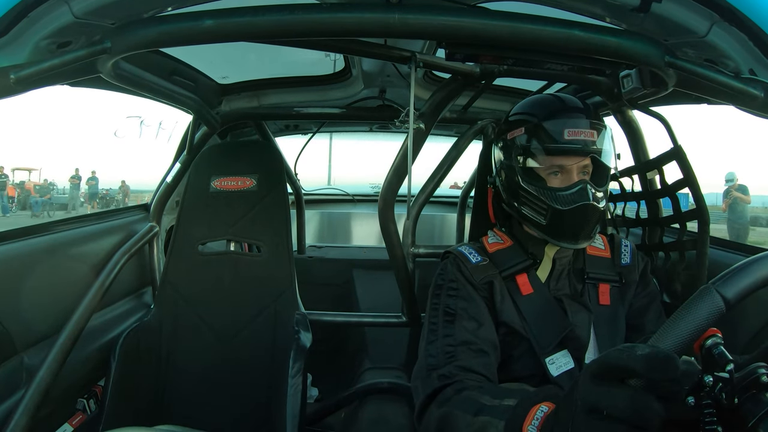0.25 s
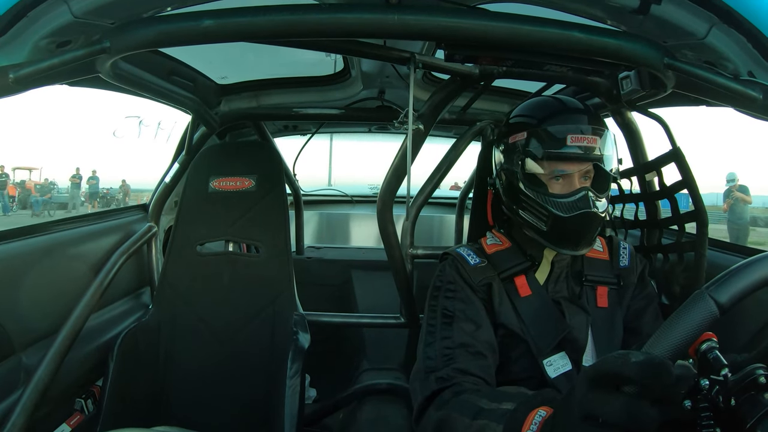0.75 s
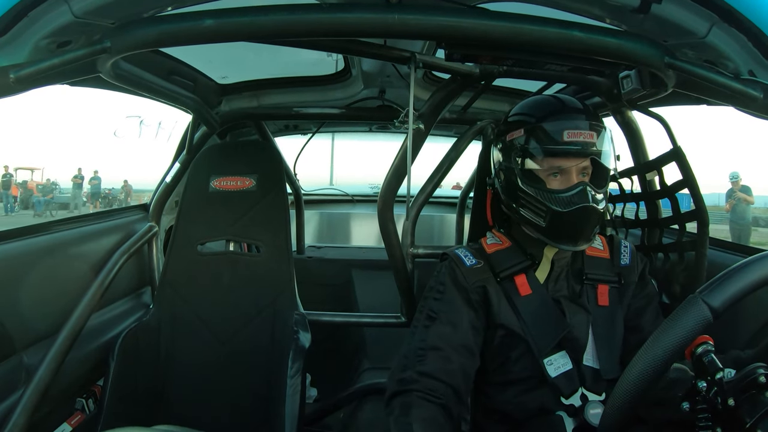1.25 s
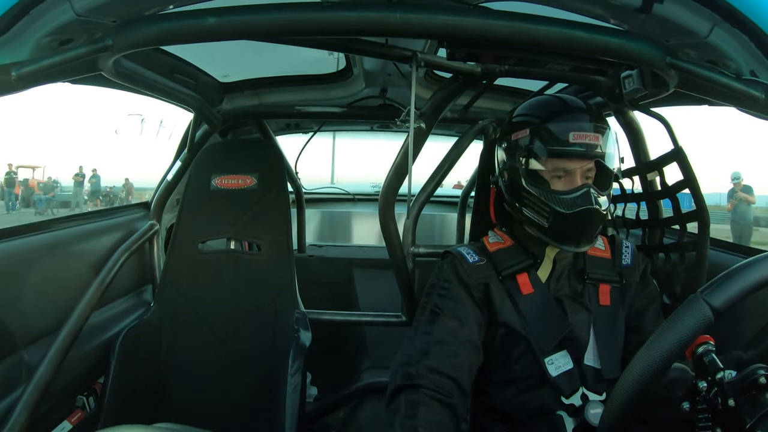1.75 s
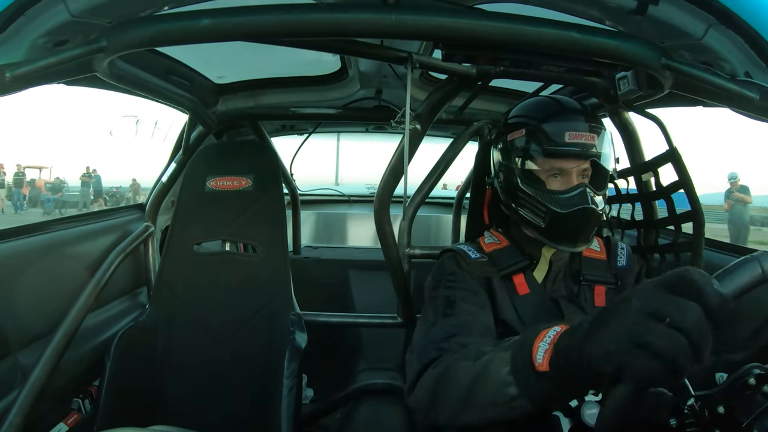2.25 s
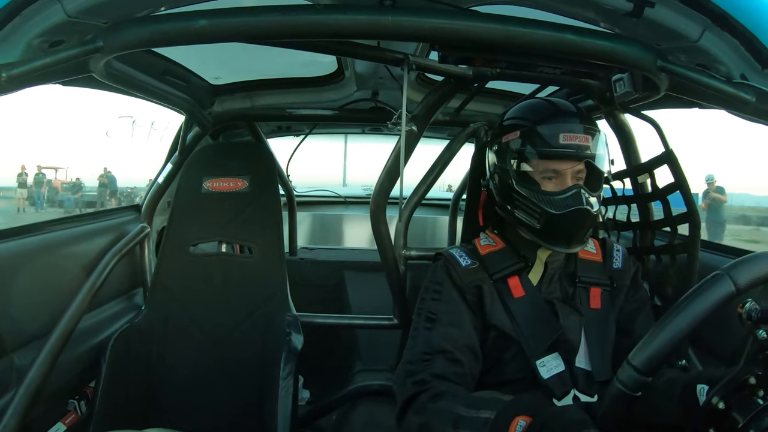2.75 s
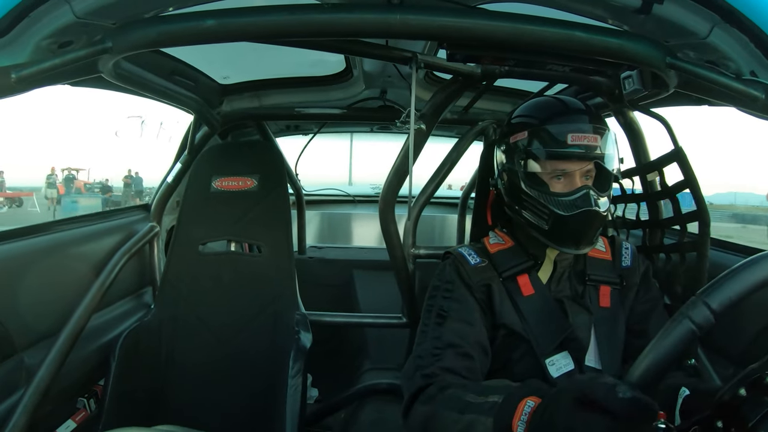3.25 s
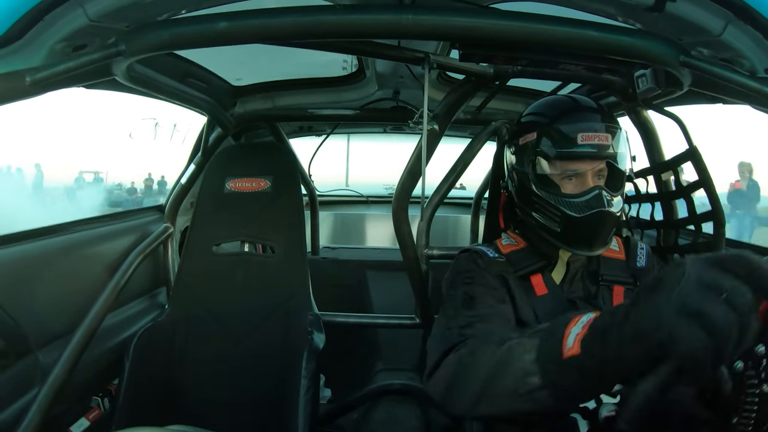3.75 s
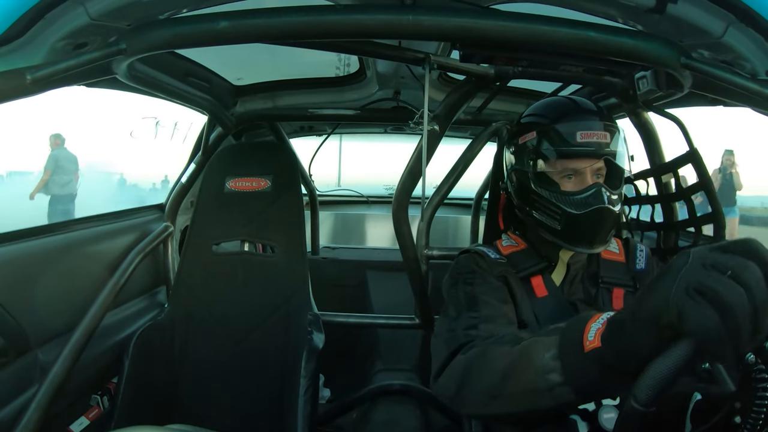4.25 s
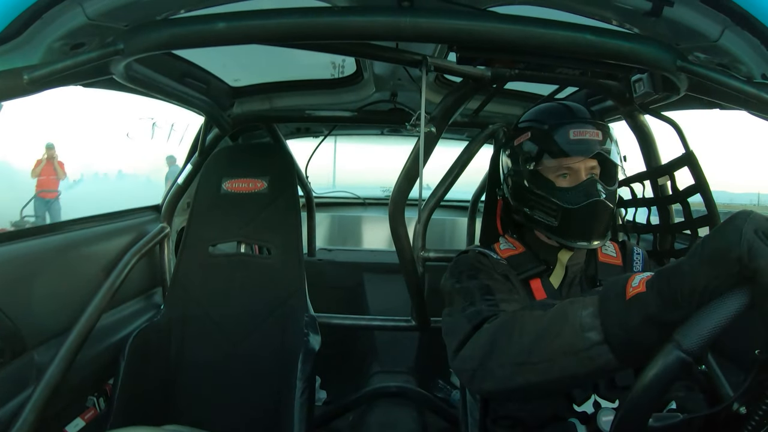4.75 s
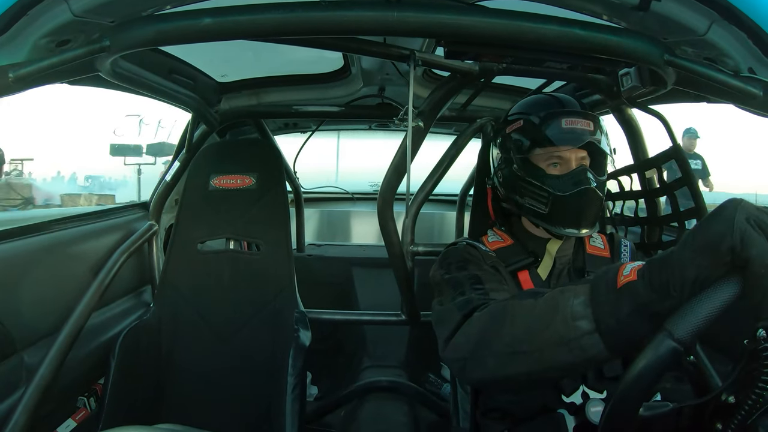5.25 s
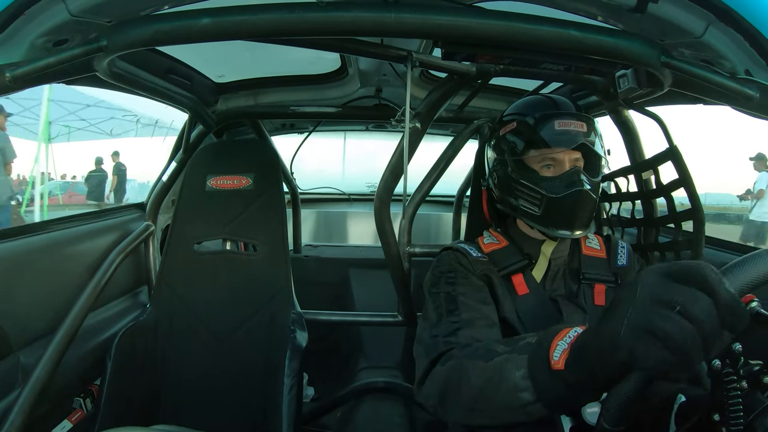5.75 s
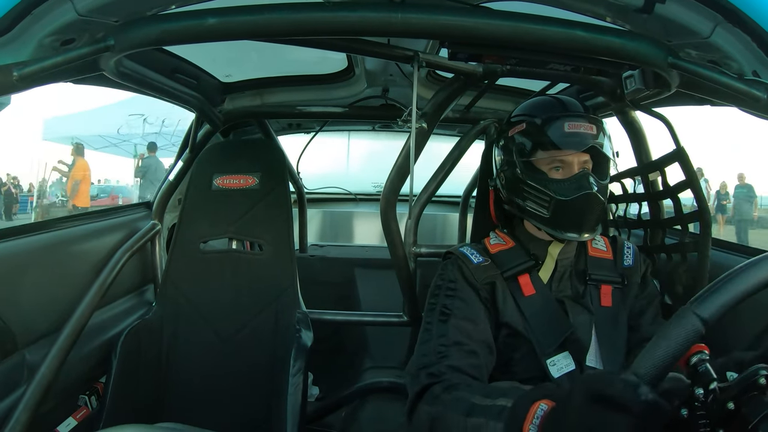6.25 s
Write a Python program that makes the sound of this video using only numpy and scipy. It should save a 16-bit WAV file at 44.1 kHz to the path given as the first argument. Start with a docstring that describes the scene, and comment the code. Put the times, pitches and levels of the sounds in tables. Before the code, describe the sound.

A turbocharged V8 booms and drones, heard from the dashboard inside a bare race car cabin. The revs climb from the start, with a thin turbo whistle rising from about 0.4 seconds. At 1.5 seconds the gear changes with a thump and two ringing panel knocks. The revs sag until about 2.2 seconds, then build again in a loud, raspy burnout, peaking just after 4 seconds. Beneath the engine, the spinning tyres hiss and fling sharp ticks of grit. Around 4.3 seconds the throttle shuts: air rushes out with a cluster of spits, a fluttering valve shriek follows from 4.5 to 4.7 seconds, and the exhaust gives several low booms. By 5 seconds the engine has dropped to a much quieter burble. The car rolls on with road rumble, a slight lift in revs and light knocks near 5.7 seconds, and a faint whistle sinking until 6.5 seconds.

```python
"""A turbo V8 booms and whistles up through first gear, heard inside a caged race car. It shifts at 1.5 s,
holds a burnout, then lifts off and rolls on. Exhaust orders drone in the bare cabin, gas rasps with
each firing, and the tyres hiss and fling grit at the wheel wells. The blow-off valve shrieks as the
throttle shuts, and the turbo's rotor winds down."""
import sys
import numpy as np
from scipy import signal
from scipy.fft import rfft, irfft
from scipy.io import wavfile
from scipy.ndimage import uniform_filter1d, minimum_filter1d

SR = 44100
rng = np.random.default_rng(int(sys.argv[2]) if len(sys.argv) > 2 else 0)


def inscribe(sig):
    """Save sig as 16-bit PCM at rate SR to the path in sys.argv[1].

    A 1-D sig is mono; a 2-D sig holds one channel per row.
    Samples are clipped to [-1, 1] before scaling.
    """
    pcm = np.round(np.clip(np.atleast_2d(sig).T, -1, 1) * 32767)
    wavfile.write(sys.argv[1], SR, pcm.astype(np.int16))


N = 286650
T = np.arange(N) / SR
BIN_HZ = np.fft.rfftfreq(N, 1 / SR) + 1
SPIN_START_S, SPIN_END_S = 1.4, 4.75  # the rear tyres break loose, then grip again


def undb(db):
    """Decibels to gain."""
    return 10 ** (np.asarray(db) / 20)


def unit(x):
    """Scale to rms 1."""
    return x / np.sqrt(np.mean(x ** 2))


def curves(table):
    """One control curve for each column after the time."""
    times, *columns = np.transpose(table)
    return [np.interp(T, times, column) for column in columns]


def held(start, end, attack, release):
    """Envelope that rises linearly, holds and dies away; times in seconds."""
    return np.clip((T - start) / attack, 0, 1) * np.exp(-np.clip((T - end) / release, 0, 20))


def bell(x, centre, half_width):
    """Bell-shaped rise and fall around a moment or a frequency."""
    return np.exp(-np.minimum(((x - centre) / half_width) ** 2, 20))


def response(hz, points):
    """Gain of a (Hz, dB) spectrum, falling steeply beyond its ends."""
    f, db = np.transpose(points)
    skirt = np.minimum(1, np.minimum(hz / f.min(), f.max() / hz)) ** 3
    return undb(np.interp(np.log(hz), np.log(f), db)) * skirt


def colour(x, points):
    """Filter by a (Hz, dB) spectrum; the result has rms 1."""
    return unit(irfft(rfft(x) * response(BIN_HZ, points), N))


def ring(x, modes):
    """Drive a bank of resonances; the result has rms 1."""
    gain = sum((-1) ** i * undb(db) / (1 + 1j * (BIN_HZ ** 2 - hz ** 2) / (BIN_HZ * width))
               for i, (hz, width, db) in enumerate(modes))
    span = response(BIN_HZ, [(modes[0][0], 0), (modes[-1][0], 0)])
    return unit(irfft(rfft(x) * gain * span, N))


def noise():
    """White noise."""
    return rng.standard_normal(N)


def walk(rate):
    """Random wander of rms 1 with about `rate` turns a second."""
    points = rng.standard_normal(N // 10)
    return unit(np.interp(T * rate, np.arange(len(points)), points))


def angle(hz):
    """Running phase of a moving frequency."""
    return 2 * np.pi * np.cumsum(hz) / SR


def tone(phase, rough, rate):
    """A tone of rms 1; roughness scatters part of it into a band about `rate` Hz wide."""
    wave = (1 + rough * walk(rate)) * np.sin(phase) + rough * walk(rate) * np.cos(phase)
    return wave / np.sqrt(.5 + rough ** 2)


# The dull colour of the track. Each row: frequency in Hz, gain in dB.
ROAD_COLOUR = [(18, -10), (30, -4.5), (50, -3), (100, -2), (200, -12), (270, -19.5), (400, -15.5),
               (550, -30), (900, -55.5)]
# The track rumble's fader. Each row: time in seconds, level in dB.
ROAD_LEVEL = [(0, -35), (1.35, -37), (1.55, -27), (2.2, -24.5), (2.8, -26), (3.4, -28.5), (4.2, -29),
              (4.55, -20), (5, -25.5), (5.7, -23), (6.5, -27.5)]

def chassis(cycle_hz, rev_octaves, spin):
    """Spinning wheels and drive shaft, geared to the crank, shake the shell over the track's rumble."""
    turn = angle(.64 * cycle_hz)
    build_up = np.clip((T - SPIN_START_S) / 3.1, 0, 1)
    shake = tone(turn, rough=.2, rate=16) + undb(-9) * tone(2 * turn, rough=.18, rate=8.4)
    wheels = build_up * undb(-28.5 + 17 * rev_octaves) * shake
    shaft = undb(-26.5) * tone(2.5 * turn, rough=.33, rate=12)
    road_db, = curves(ROAD_LEVEL)
    return spin * (wheels + shaft) + colour(noise(), ROAD_COLOUR) * undb(road_db)


# The ring of bare panels and glass. Each row: frequency in Hz, width in Hz, gain in dB.
PANEL_MODES = [(820, 45, 5), (1020, 39, 5.5), (1133, 50, 4.5), (1330, 100, 3), (1423, 50, 5.5),
               (1534, 59, 2.5), (1662, 47, 2), (1800, 45, 0), (2250, 110, -14), (2660, 67, -11),
               (3530, 82, -14)]
# Knocks at the shift and as the car rolls on. Each row: start in seconds, level in dB, decay in seconds.
KNOCK_HITS = [(1.508, -32, .04), (1.715, -32, .022), (5.686, -37, .02), (5.96, -40, .02)]

def knocks():
    """Loose parts hit the bare panels with a crack and a ring."""
    envelope = sum(undb(db) * held(s, s, attack=.002, release=decay) for s, db, decay in KNOCK_HITS)
    panels = ring(noise(), PANEL_MODES)
    crack = colour(noise(), [(900, 0), (2400, 0), (5000, -15)])
    return envelope * unit(panels + undb(-1.5) * crack)


# The rasp's fader. Each row: time in seconds, level in dB before a 2 dB lift.
RASP_FADER = [(0.0, -37.5), (0.53, -35.5), (0.57, -38.5), (0.98, -33), (1.01, -35), (1.57, -29),
              (1.58, -33.5), (2.28, -35), (2.67, -32), (2.71, -34.5), (4.22, -33.5), (4.28, -37),
              (4.69, -40.5), (4.9, -50), (5.45, -48.5), (5.6, -44.5), (6.38, -44), (6.4, -46.5)]
# The colour of the gas. Each row: frequency in Hz, gain in dB.
GAS_COLOUR = [(500, -2), (800, 3), (1150, -10.5), (1450, -16.5), (1950, -7.5), (2600, -13.5), (3100, -20),
              (4200, -22), (7000, -30)]

def rasp(crank):
    """Gas and valve-train noise throbs with firings and banks, and rings the panels."""
    throb = np.exp(.087 * np.cos(8 * crank) + .096 * np.cos(2 * crank) + .084 * np.cos(crank))
    one_cycle = rng.standard_normal(256)  # the same clatter comes round every engine cycle
    clatter = np.interp(crank / (2 * np.pi), np.arange(256) / 256, one_cycle, period=1)
    panels = ring(throb * (noise() + .39 * clatter), PANEL_MODES)
    gas = colour(throb * noise(), GAS_COLOUR)
    level_db, = curves(RASP_FADER)
    return unit(panels + undb(-.5) * gas) * undb(level_db + 2)


# Air through the engine, strongest under boost. Each row: time in seconds, level in dB before a 2 dB lift.
ENGINE_AIR = [(0, -53), (.45, -54.5), (1.3, -51), (4.75, -52.5), (5.3, -53.5), (5.7, -57), (6.5, -56.5)]
# The tyres tear harder. Each row: centre in seconds, boost in dB, half length in seconds.
TYRE_SURGES = [(1.42, 3, 0.15), (2.1, 4, 0.17), (3.616, 4, 0.22), (4.143, 2, 0.25)]
# The colours of hiss and grit. Each row: frequency in Hz, gain in dB.
HISS_COLOUR = [(1500, -4.5), (2700, 9.5), (3600, 0), (4200, 0.5), (4800, -6.5), (5800, -1), (7200, -8),
               (9000, -7.5), (9900, -26), (13000, -32)]
GRIT_COLOUR = [(3000, -10.5), (6500, 1), (9000, -4), (10000, -9.5), (13300, -14.5), (15000, -28)]

def tyres_and_air(spin):
    """Tearing rubber and engine air share an uneven hiss; grit stands out when the spin is fierce."""
    air_db, = curves(ENGINE_AIR)
    tyre_db = -52 + sum(db * bell(T, s, half) for s, db, half in TYRE_SURGES)
    level_db = 20 * np.log10(np.hypot(undb(air_db), undb(tyre_db) * spin))
    hiss = colour(noise() * undb(1.9 * walk(60)), HISS_COLOUR)
    grains = (rng.random(N) < 260 / SR) * noise()  # about 260 a second
    grains *= undb(3.2 * np.minimum(rng.exponential(size=N), 2))
    grit_db = np.clip(2 * (level_db + 47), -25, 0) - 10
    return (hiss + undb(grit_db) * colour(grains, GRIT_COLOUR)) * undb(level_db + 2)


# The loudest spits. Each row: start in seconds, level in dB, decay in seconds.
SPIT_HITS = [(1.349, -38.5, 0.029), (1.436, -33.5, 0.011), (1.689, -41, .005), (1.997, -39, 0.0046),
             (2.04, -42, .005), (2.215, -38, .005), (2.281, -42, .003), (2.41, -44, .003),
             (2.495, -41, 0.021), (2.705, -38.5, .005), (3.018, -43, .003), (3.555, -38, .005),
             (3.732, -38, 0.0052), (3.755, -39, .004), (4.232, -41, 0.004), (4.347, -39, 0.0036),
             (4.385, -34.5, 0.0042), (4.423, -35, .003), (4.447, -39, .003), (4.464, -36, .003),
             (4.487, -32.5, 0.0031), (4.509, -30, 0.0028), (4.527, -36, 0.0045), (4.642, -34, .009),
             (4.749, -41, .004), (5.692, -48, .003), (6.137, -44, .002), (6.371, -44, .003)]
# The bright colour of bursting air. Each row: frequency in Hz, gain in dB.
BURST_COLOUR = [(1500, -22.5), (4000, 6.5), (8500, 0.5), (10500, -9.5), (13500, -18), (16000, -24)]

def spits():
    """Short sharp bursts of air and flung grit."""
    envelope = np.zeros(N)
    for start, db, decay in SPIT_HITS:
        age = np.maximum(T - start, 0)
        envelope += undb(db) * (1 - np.exp(-age / .00042)) * np.exp(-np.minimum(age / decay, 20))
    return envelope * colour(noise(), BURST_COLOUR)


# The intake duct's resonances. Each row: frequency in Hz, half width in Hz, boost in dB.
DUCT_MODES = [(1350, 170, 11), (2240, 130, 9), (2780, 100, 3), (3200, 200, 2), (3560, 70, 3),
              (4200, 120, 3), (5200, 120, 3)]

def whistle(hz, width_hz):
    """A flickering whistle, wrapped in air torn by the rotor, flares as it passes the duct's resonances."""
    phase = angle(hz * (1 + .021 * walk(500)))
    flicker_db = 2 * walk(25)
    duct_db = sum(db / (1 + ((hz - centre) / half) ** 2) for centre, half, db in DUCT_MODES)
    air = undb(-3.5) * tone(phase, rough=9, rate=1100)
    return undb(flicker_db + duct_db) * (tone(phase, rough=3, rate=width_hz) + air)


# The rotor's run-down. Each row: time in seconds, pitch in Hz, level in dB before the duct.
RUN_DOWN = [(4.72, 3650, -62), (5.18, 3610, -66), (5.25, 3590, -56), (5.34, 3560, -55.5), (5.42, 3450, -61),
            (5.5, 3250, -59), (5.68, 3000, -56.5), (5.85, 2880, -61), (5.97, 2780, -58), (6.25, 2480, -59),
            (6.5, 2350, -63)]

def turbo():
    """The rotor whistles up under boost, fading as it climbs; after the lift it hangs on, then drag slows it."""
    start_s, heard_s, fade_db_per_s = .38, .43, 11.5
    up_hz = 4260 * np.sqrt(np.clip(T - start_s, 0, 2))  # steady power: pitch grows with the root of time
    up_gain = held(heard_s, 1.39, attack=.03, release=.04) * undb(-46 - fade_db_per_s * (T - heard_s))
    overtone_gain = undb(-14) * held(heard_s, .74, attack=.03, release=.087)
    spool = whistle(up_hz, width_hz=300) + overtone_gain * whistle(2 * up_hz, width_hz=350)
    down_hz, down_db = curves(RUN_DOWN)
    down_gain = held(RUN_DOWN[0][0], T[-1], attack=.05, release=1) * undb(down_db)
    return up_gain * spool + down_gain * whistle(down_hz, width_hz=270)


# The valve's shriek. Each row: harmonic number, relative level in dB.
SHRIEK_PARTIALS = [(1, 3.5), (2, -2.5), (3, -4), (4, -14), (5, -16)]

def blow_off():
    """Dumped boost chuffs through the pipework; the valve's shriek sinks as the pressure falls."""
    dump_s, open_s, shut_s = 4.3, 4.49, 4.69
    valve_hz, chuff_hz = 1480, 48
    sag = np.exp(-1.15 * np.maximum(T - open_s, 0))
    phase = angle(valve_hz * sag * (1 + .02 * walk(1400)))
    flutter_db = 1.5 * walk(150) + 2.5 * np.cos(angle(chuff_hz * (1 + .12 * walk(30))))
    shriek = sum(undb(db) * tone(k * phase, rough=.9, rate=380) for k, db in SHRIEK_PARTIALS)
    shriek *= undb(-36.5) * held(open_s, shut_s, attack=.13, release=.05)
    air = colour(noise(), BURST_COLOUR) * undb(-48.5) * held(dump_s, shut_s, attack=.13, release=.05)
    pipework = [(700, 1), (1150, 6), (1900, -10), (2600, -6), (3300, -17), (5800, -18), (8000, -24)]
    rush = colour(noise(), pipework) * undb(-42) * held(dump_s, shut_s, attack=.18, release=.1)
    return (air + rush + shriek) * undb(flutter_db)


# Single booms. Each row: centre in seconds, pitch in Hz, peak in dB, half length in seconds.
BOOMS = [(1.558, 42, -19, 0.067), (1.726, 79.5, -23, 0.047), (1.98, 35, -21, .06),
         (3.149, 83.3, -14, 0.014), (4.29, 350, -17, 0.07), (4.368, 210, -16, .04),
         (4.406, 296, -24, 0.039), (4.47, 207, -15, 0.033), (4.55, 145, -13, .045),
         (4.612, 208, -13.5, 0.03), (4.63, 43, -15, 0.12), (4.632, 417, -19.5, 0.03),
         (4.775, 178.5, -13, 0.021), (4.814, 100.4, -15.5, 0.036), (4.915, 91, -17.5, 0.086),
         (5.312, 209.4, -24, 0.063), (5.506, 150, -17.5, .035), (5.638, 347.4, -29.5, 0.08)]

def jolts():
    """Single resonances swell and die as the drivetrain jolts and on the overrun."""
    return sum(undb(db) * bell(T, s, half) * np.sin(2 * np.pi * (hz * T + rng.random()))
               for s, hz, db, half in BOOMS)


# Standing waves of the cabin air. Each row: frequency in Hz, width in Hz, gain in dB.
CABIN_MODES = [(43, 14, -7), (100.9, 3.2, 5), (141.5, 6.7, 5), (208, 24.6, 2), (304.8, 20, -1),
               (365.5, 7.7, 0.5), (414.7, 13.6, 1), (475.5, 40, -6), (574.5, 37, -10.5), (682, 140, -17)]

def burble(crank, growl_db, ragged):
    """No two firings are equally strong: the scatter rings the cabin air between the orders."""
    firings = np.flatnonzero(np.diff(np.floor(crank * 4 / np.pi)))  # eight to a cycle
    kicks = np.zeros(N)
    kicks[firings] = noise()[:len(firings)]
    return ring(kicks, CABIN_MODES) * np.sqrt(ragged) * undb(.53 * growl_db - 18)


# Where an order meets a resonance of pipes and cabin.
# Each row: order, frequency in Hz, half width in Hz, relative peak in dB.
CRITICAL_SPEEDS = [(2, 91.4, 7.7, -23.5), (3, 95, 5, -17), (3, 142, 15, -15.5), (4, 64.7, 10.5, -2),
                   (4, 141, 10, -26.5), (4, 178, 15, -14.5), (5, 94, 9.3, -9.5), (5, 143.7, 13.4, -9.5),
                   (5, 192.6, 23.5, -9.5), (6, 92.4, 7.6, -9.5), (6, 203.5, 14, -19.5), (6, 282, 16, -22.5),
                   (7, 297, 11.7, -24.5), (8, 147, 24, -12), (8, 216, 8.2, -22), (8, 229, 43, -21),
                   (8, 338.4, 30, -20.5), (8, 355, 11, -18), (9, 153, 17, -20), (9, 252, 9.3, -26.5),
                   (9, 302, 32, -25), (9, 358, 9.8, -30), (9, 416, 10, -27), (10, 294, 13, -16),
                   (10, 421, 9.2, -24.5), (10, 466, 40, -28), (11, 318, 10, -28), (11, 500, 25, -29.5),
                   (12, 208.5, 9.9, -21), (12, 338, 8.8, -31), (13, 210, 11.4, -22), (13, 344, 15, -24),
                   (13, 424, 20, -19.5), (13, 480, 18, -26.5), (13, 580, 43, -24), (15, 665, 14, -33),
                   (16, 408.7, 19, -15.5), (16, 660, 26, -29), (16, 775, 15, -27.5), (17, 480, 17, -35),
                   (17, 646, 17, -34), (17, 686, 7.9, -29.5), (18, 659.4, 28, -23.5), (21, 582, 12, -33),
                   (22, 874, 8.3, -36), (23, 928, 8, -40.5)]

def drone(order, phase, cycle_hz, load_db, ragged):
    """An order firms up into a drone as the revs carry it through a resonance, louder under load."""
    resonance = sum(undb(db) * bell(order * cycle_hz, centre, half)
                    for k, centre, half, db in CRITICAL_SPEEDS if k == order) / np.sqrt(2)
    sweep_hz_per_s = uniform_filter1d(np.abs(np.gradient(cycle_hz)) * SR, size=4000)
    lag_db = .17 * sweep_hz_per_s * np.sqrt(order / 5)  # resonances need time to build
    rough = (.03 + .27 * ragged ** 2) * max(1, order / 5)
    return tone(phase, rough, rate=30) * resonance * undb(2.5 + .85 * load_db - lag_db)


# The uneven firing of the two banks. Each row: order (multiple of the cycle rate), relative level in dB.
ENGINE_ORDERS = [(1, 2.5), (2, 3.5), (3, -6.5), (4, -3.5), (5, -4.5), (6, -8.5), (7, -7.5), (8, -4),
                 (9, -4.5), (10, -1.5), (11, -10), (12, -4.5), (13, -2.5), (14, -0.5), (15, -1.5), (16, 2),
                 (17, -1.5), (18, -2), (19, -7.5), (20, 2), (21, -0.5), (22, -8.5), (23, -0.5), (24, 1)]
# The cabin's colour on the exhaust. Each row: frequency in Hz, gain in dB.
CABIN_COLOUR = [(25.0, -35), (45.0, -36), (68.0, -32), (92.0, -32), (115.0, -35.5), (142.0, -22),
                (170.0, -35.5), (200.0, -22.5), (255.0, -30.5), (310.0, -25.5), (350.0, -27), (385.0, -42),
                (425.0, -31), (480.0, -37.5), (525.0, -41), (585.0, -33.5), (630.0, -41.5), (675.0, -37.5),
                (780.0, -52), (1100.0, -47)]

def exhaust(cycle_hz, crank, load_db, growl_db, ragged):
    """A ladder of rough engine orders slides through the cabin: low ones rumble, higher ones growl."""
    muffler_hz = 714
    rumble_db = -4 + 15.5 * ragged + .25 * load_db
    out = 0
    for order, db in ENGINE_ORDERS:
        hz = order * cycle_hz
        growl_share = np.clip((hz - 150) / 110, 0, 1)
        drive_db = rumble_db + growl_share * (growl_db - rumble_db)
        muffler_db = -14 * np.clip((hz - muffler_hz) / 110, 0, 1)
        # the cabin scrambles the low orders; the high ones stay in step and bark once a cycle
        scatter = 2.4 if order < 11 else .7
        phase = order * crank + scatter * rng.standard_normal()
        partial = tone(phase, rough=ragged * (.35 + .05 * order), rate=36)
        out += partial * response(hz, CABIN_COLOUR) * undb(db + drive_db + muffler_db - 1)
        out += drone(order, phase, cycle_hz, load_db, ragged)
    return out


# The revs: up through first gear, down after the shift, up in the burnout, then off.
# Each row: time in seconds, cycle rate in Hz (rpm / 120).
REVS = [(0.0, 26.5), (0.15, 27.3), (0.3, 27.9), (0.58, 28.6), (0.69, 30.1), (0.8, 34.0), (1.1, 41.3),
        (1.3, 46.7), (1.5, 49.6), (1.56, 43.5), (1.79, 40.5), (1.92, 37.0), (2.05, 32.4), (2.2, 31.1),
        (2.35, 32.7), (2.5, 35.3), (2.8, 38.1), (3.1, 38.5), (3.3, 39.3), (3.5, 40.3), (3.65, 40.6),
        (3.85, 43.0), (4.0, 45.7), (4.15, 46.4), (4.45, 40.4), (4.65, 33.1), (4.88, 24.0), (5.25, 15.4),
        (5.5, 15.0), (5.8, 18.4), (6.0, 18.2), (6.5, 15.9)]
# How hard the engine pulls: smooth on held revs, ragged as they swing.
# Each row: time in seconds, load in dB, roughness from 0 to 1.
ENGINE_LOAD = [(0, 2.5, 0.11), (.55, -0.5, 0.24), (.71, 2, .32), (.84, 0, 0.74), (1.22, 0.5, 0.3),
               (1.42, 0, 0.35), (1.6, -1.5, 0.62), (2.3, 0, 0.7), (2.56, -1, 0.29), (3.42, 0, 0.24),
               (3.75, -1, 0.41), (4.1, -1.5, .22), (4.3, -3.5, 0.48), (4.42, -7, 0.82), (4.75, -17, 0.91),
               (4.98, -22, .7), (5.27, -21.5, 0.3), (5.58, -12.5, 0.28), (6.5, -13.5, 0.42)]
# The engine stumbles. Each row: centre in seconds, dip or lift in dB, half length in seconds.
ENGINE_STUMBLES = [(3.138, -11, 0.0072), (1.535, 4.5, 0.03)]

def scene():
    """Revs and load drive the engine; everything meets in mono at the dashboard."""
    cycle_hz, = curves(REVS)
    load_db, ragged = curves(ENGINE_LOAD)
    rev_octaves = np.log2(cycle_hz / 38)  # above cruising speed
    growl_db = 5 + 6 * rev_octaves + 1.37 * load_db
    spin = held(SPIN_START_S, SPIN_END_S, attack=.038, release=.14)  # 0 gripping, 1 spinning
    crank = angle(cycle_hz * (1 + .014 * ragged ** 2 * walk(50)))  # 2 pi per engine cycle
    stumble_db = sum(db * bell(T, s, half) for s, db, half in ENGINE_STUMBLES)
    pipes = exhaust(cycle_hz, crank, load_db, growl_db, ragged) + burble(crank, growl_db, ragged)
    engine = pipes * undb(stumble_db) + jolts() + rasp(crank) + turbo() + blow_off()
    return (engine + tyres_and_air(spin) + spits() + knocks() + chassis(cycle_hz, rev_octaves, spin))[None]


def record(dry):
    """A limiter holds down the peaks, and the top treble is cut."""
    ceiling, top_hz = .8, 14600
    gain = np.minimum(1, ceiling / (np.abs(dry) + 1e-9))
    gain = uniform_filter1d(minimum_filter1d(gain, size=500), size=500)
    fade_in = np.minimum(T / .004, 1)
    lowpass = signal.ellip(8, .2, 70, top_hz, fs=SR, output="sos")
    return signal.sosfilt(lowpass, dry * gain * fade_in)


dry = scene()
out = record(dry)
inscribe(out)
```